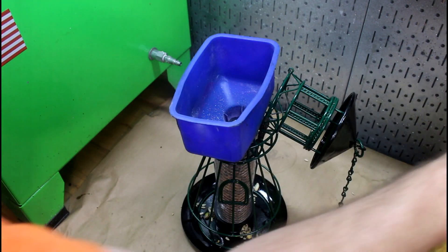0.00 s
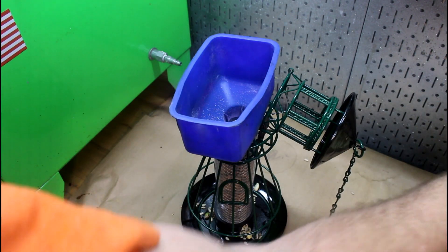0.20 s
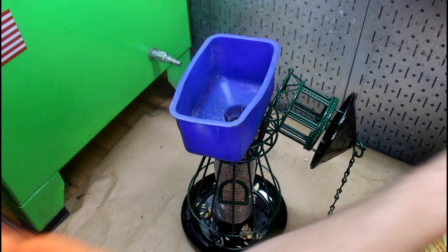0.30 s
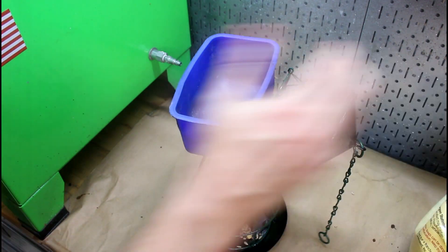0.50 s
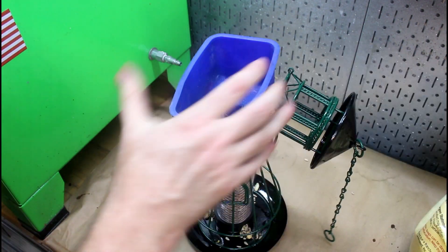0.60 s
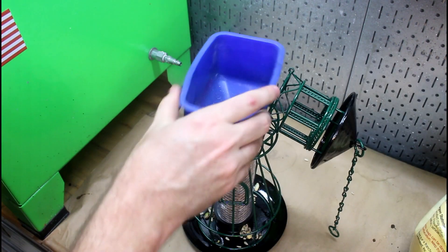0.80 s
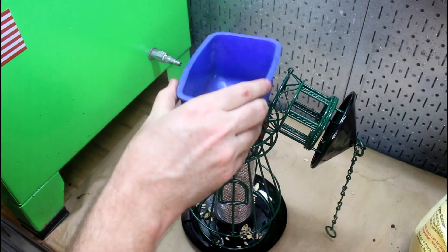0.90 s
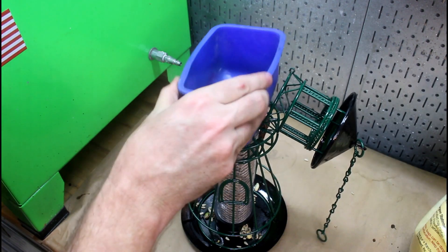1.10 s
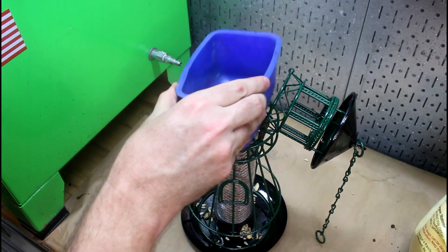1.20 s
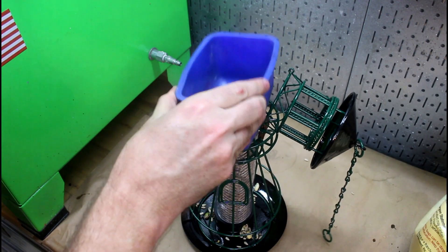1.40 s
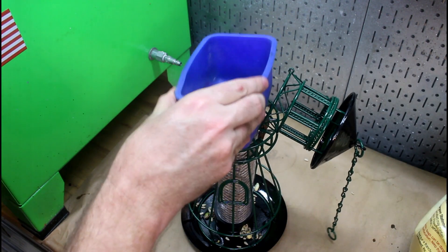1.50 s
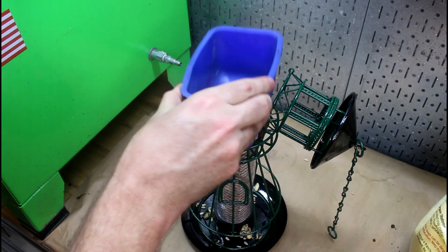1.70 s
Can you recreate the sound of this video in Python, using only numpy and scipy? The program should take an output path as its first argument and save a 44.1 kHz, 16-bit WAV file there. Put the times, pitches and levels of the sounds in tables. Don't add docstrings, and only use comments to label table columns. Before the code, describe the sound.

Close up in a quiet small shed, stiff bag film crumples and pops with a soft thud, fading to stray crackles; then a gripped plastic funnel knocks and booms on a mesh tube while loose seeds tick down.

```python
import sys
import numpy as np
from scipy import signal
from scipy.fft import rfft, irfft
from scipy.io import wavfile
from scipy.ndimage import uniform_filter1d

SR = 44100
rng = np.random.default_rng(int(sys.argv[2]) if len(sys.argv) > 2 else 0)


def generate_wav(signal):
    frames = np.transpose(np.atleast_2d(signal))
    scaled = np.clip(frames, -1, 1) * 32767
    pcm = np.round(scaled).astype(np.int16)
    wavfile.write(sys.argv[1], SR, pcm)


def boost_factor(decibels):
    exponent = np.asarray(decibels, float) / 20
    return 10 ** exponent


N = 77175


def noise():
    return rng.standard_normal(N)


def level(x, db):
    return x * boost_factor(db) / np.sqrt(np.mean(x ** 2))


def peak(x, db):
    return x * boost_factor(db) / np.abs(x).max()


def butter(x, order, hz, kind):
    return signal.sosfilt(signal.butter(order, hz, kind, fs=SR, output="sos"), x)


def colour(x, tone):
    hz, db = np.array(tone, float).T
    bins_hz = np.arange(513) * SR / 1024
    log_gain = np.interp(np.log(bins_hz + 1), np.log(hz), db) * np.log(10) / 20
    cepstrum = irfft(log_gain)
    cepstrum[1:512] *= 2
    cepstrum[513:] = 0
    return signal.fftconvolve(x, irfft(np.exp(rfft(cepstrum))))[:N]


def ring(x, hz, t60):
    pole = np.exp(2j * np.pi * hz / SR - np.log(1000) / (t60 * SR))
    return butter(signal.lfilter([1], [1, -pole], x).imag, 2, hz / 2, "high")


def swell_ring(x, hz, swell_t60, t60):
    return ring(ring(x, hz, swell_t60), hz, t60)


def fade(t, t60):
    return (t >= 0) * boost_factor(-60 * np.maximum(t, 0) / t60)


def click(t, start, push_s):
    phase = np.clip((t - start) / push_s, 0, 1)
    return np.sin(np.pi * phase) * np.pi / (2 * push_s * SR)


def bursts(t, table, fall_t60):
    power = 0
    for start, rise, hold, db in table:
        after_rise = t - start - rise
        attack = np.clip((t - start) / max(rise, 1e-4), 0, 1) ** 2
        fall = np.where(after_rise < hold, 1, fade(after_rise - hold, fall_t60))
        power = power + (boost_factor(db) * attack * fall) ** 2
    return np.sqrt(power)


def grains(spread_db, patchy_db, clump_db):
    out = 0
    clump_size = np.minimum(rng.exponential(size=N // 40 + 1), 4)
    clumps = clump_db * np.repeat(clump_size, 40)[:N]
    for hz in 250 * 2 ** np.arange(0, 5.3, .5):
        patch = int(SR * 3 / hz) + 60
        flicker = np.repeat(rng.standard_normal(N // patch + 1), patch)
        flicker = uniform_filter1d(flicker, patch)[:N]
        impacts = noise()
        size_db = spread_db * np.minimum(rng.exponential(size=N), 4)
        impacts = impacts * boost_factor(size_db + patchy_db * flicker + clumps)
        out = out + butter(impacts, 1, (hz / 1.19, hz * 1.19), "band")
    return level(out, 0)


def rattle(env, tone, spread_db, patchy_db, clump_db):
    crowd = grains(spread_db, patchy_db, clump_db)
    steady_rms = np.sqrt(np.mean(colour(crowd, tone) ** 2))
    return crowd * env, colour(crowd * env, tone) / steady_rms


# f/Hz, level/dB per Hz
SHED_TONE = [(15, -17.5), (25, -16.5), (118, -9.5), (151, -12), (301, -13.5), (340, -15.5), (366, -16),
             (7210, -35.5), (9000, -56.5), (11700, -73.5), (19800, -120)]
# f/Hz, width/Hz, level/dB
HUM_BANDS = [(59.5, 3.5, -54.5), (145.6, 7.5, -55.5)]


def shed():
    out = level(colour(noise(), SHED_TONE), -51.5)
    for hz, width_hz, db in HUM_BANDS:
        out = out + level(ring(noise(), hz, np.log(1000) / np.pi / width_hz), db)
    return out


# t/s, rise/s, hold/s, level/dB
CRUMPLES = [(0.124, 0.13, 0.064, -43.5), (0.908, 0.036, 0.018, -44), (0.2469, 0.0024, 0.0018, -12.5),
            (0.257, 0.0058, 0.011, -17.5), (0.262, 0.003, 0.007, -26.5), (0.28, .001, 0.0028, -19),
            (0.292, 0.0022, 0.069, -32), (0.36, 0.0085, 0.0032, -28), (0.375, 0.0023, 0.033, -35),
            (0.407, 0.0012, 0.014, -32.5), (0.427, 0.0026, 0.01, -37)]
# f/Hz, level/dB per Hz
FILM_TONE = [(180, -62), (300, -12.5), (460, -6.5), (725, -6), (897, 5), (1200, 0.5), (6040, -6.5),
             (7480, -12), (9000, -17.5), (11700, -40), (19800, -120)]
# t/s, level/dB, f/Hz, t60/s
THUD = (.251, -22, 200, .06)
CRUMPLE_FALL_T60_S = 0.037


def bag(t):
    crumple = rattle(bursts(t, CRUMPLES, CRUMPLE_FALL_T60_S), FILM_TONE, 3.1, 1.8, 1.1)[1]
    thud_s, thud_db, thud_hz, thud_t60 = THUD
    thud = ring(boost_factor(thud_db) * click(t, thud_s, 0.00052), thud_hz, thud_t60)
    return crumple + thud


# t/s, peak level/dB, ring f/Hz, upper ring
# f/Hz, crack level/dB
CREASE_SNAPS = [(0.176, -34.5, 1770, 880, 1.5), (0.2503, -4, 1200, 2720, 12.5),
                (0.2555, -12, 2200, 3470, -14), (0.257, -9, 1473, 2630, -10), (0.2716, -5.5, 1110, 3350, 0),
                (0.2827, -13, 2160, 6100, 0), (0.318, -22.5, 477, 544, -9), (0.375, -20.5, 1810, 2350, -18),
                (0.4506, -6, 1760, 4030, 4), (0.542, -10.5, 2335, 3560, -7), (.688, -53, 2200, 3000, -1),
                (0.7596, -27.5, 1860, 2179, -1), (.909, -48, 3000, 3830, -4.5),
                (0.934, -40, 2870, 4730, -8), (.946, -43, 2870, 4770, -12), (0.958, -42, 2920, 5600, -13),
                (0.833, -53, 2250, 3060, -3), (1.004, -41.5, 3530, 4970, 4.5)]
SNAP_T60_S, SNAP_RING_T60_S, SNAP_CRACK_T60_S, SNAP_TAIL_T60_S = .018, .008, .026, .14
SNAP_TAIL_DB, SNAP_TOP_HZ = -8.5, 8600


def snaps(t):
    def wide(x, hz, turns):
        return swell_ring(x, hz, turns / hz, turns / hz)

    out = 0
    for start, db, hz, up_hz, crack_db in CREASE_SNAPS:
        since = t - start
        a, b, c, d = rng.standard_normal((4, N)) * np.clip(since / 0.0008, 0, 1)
        burst, kick = fade(since, SNAP_T60_S), 7 * click(t, start + .0006, .0001)
        low = peak(ring(wide(a * burst + kick, hz, 2.8), hz, SNAP_RING_T60_S), 0)
        high = peak(ring(wide(b * burst + kick, up_hz, 2.8), up_hz, SNAP_RING_T60_S), 0)
        crack = peak(wide(c * fade(since, SNAP_CRACK_T60_S), 1.232 * up_hz, 2.5), crack_db)
        tail = wide(d * fade(since, SNAP_TAIL_T60_S), np.sqrt(hz * up_hz), 1.1)
        tail = peak(tail, SNAP_TAIL_DB)
        body = peak(ring(a * burst + kick, hz / 2, 6.0 / hz), -10)
        snap = low + boost_factor(-2.5) * high + body + crack + tail
        out = out + peak(butter(snap, 1, SNAP_TOP_HZ, "low"), db)
    return out


# f/Hz, level/dB, t60/s
SHELL_MODES = [(900, 3, 0.022), (1050, -11, .025), (1545, -4, 0.055), (2130, -14, .018), (2720, -20, .015)]


def shell(x):
    return sum(boost_factor(db) * ring(x, hz, t60) for hz, db, t60 in SHELL_MODES)


# t/s, peak level/dB, lowest mode f/Hz, upper modes level/dB
FUNNEL_KNOCKS = [(1.058, -41.5, 510, -6.5), (1.089, -23.5, 614, -3.5), (1.1191, -11.5, 540, -5.5),
                 (1.129, -25, 455, -14), (1.1525, -15, 551, -2), (1.209, -17, 645, -1.5),
                 (1.23, -23, 700, 1.5), (1.249, -13, 641, -5), (1.294, -18.5, 735, 1.5),
                 (1.368, -18.5, 656, -0.5), (1.402, -24, 716, 2), (1.444, -31.5, 660, -21),
                 (1.524, -31.5, 765, 1.5), (1.589, -32.5, 487, 5), (1.614, -34, 604, 3),
                 (1.629, -29, 660, -4), (1.6969, -25.5, 577, -4), (1.745, -33.5, 590, 7)]
PUSH_S, SWELL_T60_S, LOW_T60_S = .0007, .005, .021
RUB_T60_S, RUB_DB, TAP_HZ, TAP_DB = .03, -17, 2200, -19.5


def funnel(t):
    out = 0
    for start, db, hz, up_db in FUNNEL_KNOCKS:
        rub = uniform_filter1d(noise(), size=24) * fade(t - start, RUB_T60_S) * boost_factor(RUB_DB)
        push = rub - click(t, start, PUSH_S)
        low = peak(swell_ring(push, hz, SWELL_T60_S, LOW_T60_S), db)
        upper = peak(shell(ring(push, 1090.0, 0.0014)), db + up_db)
        tap = peak(ring(noise() * fade(t - start, 0.0039), TAP_HZ, 0.0003), db + TAP_DB)
        out = out + low + upper + tap
    return out


# t/s, peak level/dB, wall mode level/dB
TUBE_THUMPS = [
    (1.069, -30.5, -16),
    (1.121, -20, -19),
    (1.151, -10, 1),
    (1.249, -25, -14),
    (1.294, -8.5, -0.5),
    (1.382, -23, -19),
    (1.408, -11, -15),
    (1.521, -31, -20),
    (1.696, -28, -24),
    (1.74, -21.5, -7.5),
]
AIR_HZ, AIR_T60_S, AIR_PUSH_S = 143, 0.081, 0.0032
WALL_HZ, WALL_T60_S, WALL_PUSH_S = 327, 0.022, 0.0018


def tube(t):
    air = sum(boost_factor(db) * click(t, start, AIR_PUSH_S) for start, db, _ in TUBE_THUMPS)
    wall = sum(boost_factor(db + wall_db) * click(t, start, WALL_PUSH_S) for start, db, wall_db in TUBE_THUMPS)
    boom = swell_ring(air / 60, AIR_HZ, 0.024, AIR_T60_S)
    return boom + ring(wall, WALL_HZ, WALL_T60_S)


# t/s, rise/s, hold/s, level/dB
SEED_BURSTS = [(1.078, 0.012, 0.058, -46), (1.146, 0.023, 0.0048, -28.5), (1.17, 0.026, 0.011, -30.5),
               (1.208, 0.0098, 0.0026, -27), (1.229, 0.0017, 0.0085, -35.5), (1.246, 0.00077, 0.0036, -25),
               (1.262, 0.0068, 0.021, -21), (1.298, 0.011, 0.0055, -24), (1.322, 0.00048, 0.0025, -24),
               (1.334, .001, 0.052, -39), (1.38, 0.017, 0.035, -37.5), (1.436, .001, 0.0057, -37),
               (1.449, 0.0079, 0.008, -36.5), (1.48, 0.00078, 0.014, -40.5), (1.515, 0.00024, 0.0072, -36),
               (1.604, 0.0055, 0.02, -36.5), (1.627, 0.0009, 0.0044, -31.5), (1.704, 0.02, 0.019, -40.5),
               (1.741, 0.013, .01, -13.5)]
# f/Hz, level/dB per Hz
MESH_TONE = [(1060, -40), (1800, -15.5), (2830, -0.5), (3800, -2.5), (4150, -14), (5220, -1), (7810, -12.5),
             (9000, -7.5), (11700, -48), (19800, -120)]
# f/Hz, level/dB, t60/s
SEED_LOW_MODE = (470, -11.5, 0.1)
SEED_FALL_T60_S, TRICKLE_DB, SEED_ON_FUNNEL_DB = 0.041, -52.5, -30.5


def seeds(t):
    trickle = boost_factor(TRICKLE_DB) * np.interp(t, (0.61, 1.41), (0, 1))
    env = bursts(t, SEED_BURSTS, SEED_FALL_T60_S) + trickle
    impacts, rattling = rattle(env, [(700, -63)] + list(MESH_TONE), 2.2, 3.2, 2.5)
    low_hz, low_db, low_t60 = SEED_LOW_MODE
    rung = shell(impacts) + boost_factor(low_db) * ring(impacts, low_hz, low_t60)
    return rattling + boost_factor(SEED_ON_FUNNEL_DB) * rung


# t/s, peak level/dB, centre f/Hz
SEED_TICKS = [(1.0962, -22, 6570), (1.1218, -27, 2970), (1.1396, -34, 2950), (1.196, -22.5, 5100),
              (1.2172, -21, 3100), (1.2489, -13, 3100), (1.335, -25.5, 3830), (1.3646, -19, 3870),
              (1.383, -29, 3500), (1.402, -23, 5460), (1.4068, -19.5, 3780), (1.4151, -13.5, 3940),
              (1.424, -15.5, 5430), (1.4326, -15.5, 6100), (1.4592, -24, 3640), (1.4854, -16, 5400),
              (1.5084, -19.5, 5400), (1.5194, -30.5, 3900), (1.5603, -21.5, 6700), (1.5788, -18.5, 5150),
              (1.627, -24.5, 5000), (1.668, -55, 3430), (1.697, -23.5, 2950), (1.1617, -20.5, 2410),
              (1.1652, -15, 3100), (1.1702, -20, 4580), (1.23, -21, 2770), (1.2695, -27.5, 2880),
              (1.279, -12.5, 3000), (1.2875, -21, 4050), (1.295, -15.5, 2810), (1.3134, -7.5, 4760),
              (1.3169, -7.5, 3980), (1.357, -23, 3600), (1.4085, -16.5, 6000), (1.52, -29, 3870),
              (1.587, -31, 2570), (1.611, -34, 3330), (1.6344, -31, 3820), (1.722, -30, 5130),
              (1.7485, -28, 3200), (1.4575, -20, 4900), (1.4648, -22, 5000), (1.2822, -14, 5260),
              (1.324, -26, 3200)]
TICK_T60_S, TICK_RING_T60_S, TICK_TAIL_T60_S, TICK_TAIL_DB = .008, .0006, .071, -12


def ticks(t):
    out = 0
    for start, db, hz in SEED_TICKS:
        env = fade(t - start, TICK_T60_S) + boost_factor(TICK_TAIL_DB) * fade(t - start, TICK_TAIL_T60_S)
        out = out + peak(swell_ring(noise() * env, hz, TICK_RING_T60_S, TICK_RING_T60_S), db)
    return out


def room(near, t):
    tail = signal.lfilter([1], [1, -.4], noise()) * fade(t - .004, 0.27)
    return boost_factor(-21) * signal.fftconvolve(near, tail / np.sqrt(np.sum(tail ** 2)))[:N]


# f/Hz, level/dB
DIFFERENCE_TONE = [(60, -23), (150, -25.5), (300, -20), (700, -8.5), (1400, -4.5), (2800, -4), (5500, 0),
                   (9000, 0.5)]
SIDE_DB, SIDE_HISS_DB, RADIATE_HZ = -42.5, -73, 136


def scene():
    t = np.arange(N) / SR
    sources = bag(t) + snaps(t) + funnel(t) + tube(t) + seeds(t) + ticks(t)
    near = butter(sources, 2, RADIATE_HZ, "high")
    mono = near + room(near, t) + shed()
    smear = signal.fftconvolve(mono, rng.standard_normal(400))[:N] / 20
    side = boost_factor(SIDE_DB) * colour(smear, DIFFERENCE_TONE)
    side = side + level(colour(colour(noise(), SHED_TONE), DIFFERENCE_TONE), SIDE_HISS_DB)
    return np.array([mono + side, mono - side])


def roll_off(x):
    return signal.sosfilt(signal.butter(12, 9430, fs=SR, output="sos"), x)


def record(dry):
    top_hz = 8127 * 1.184
    mix = signal.sosfilt(signal.cheby2(12, 70, top_hz, fs=SR, output="sos"), dry)
    return roll_off(mix)


dry = scene()
out = record(dry)
generate_wav(out)
```